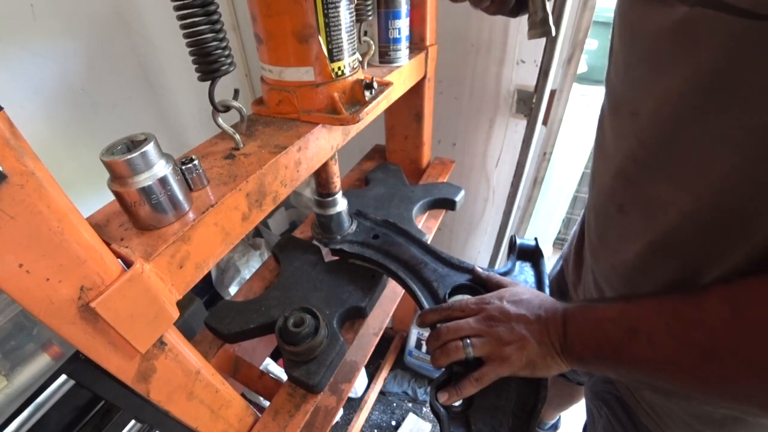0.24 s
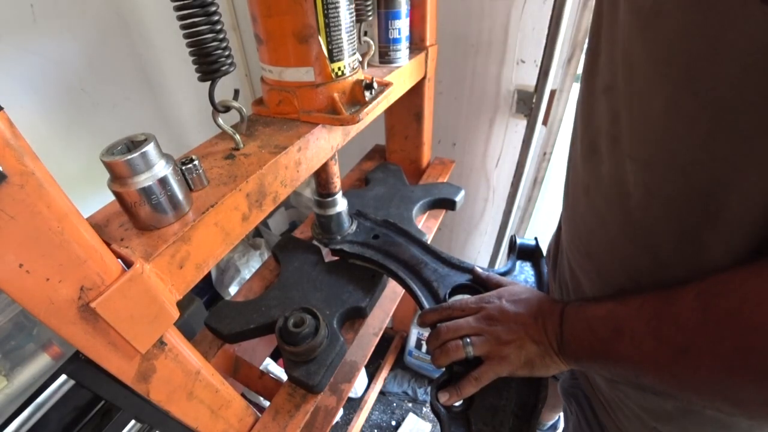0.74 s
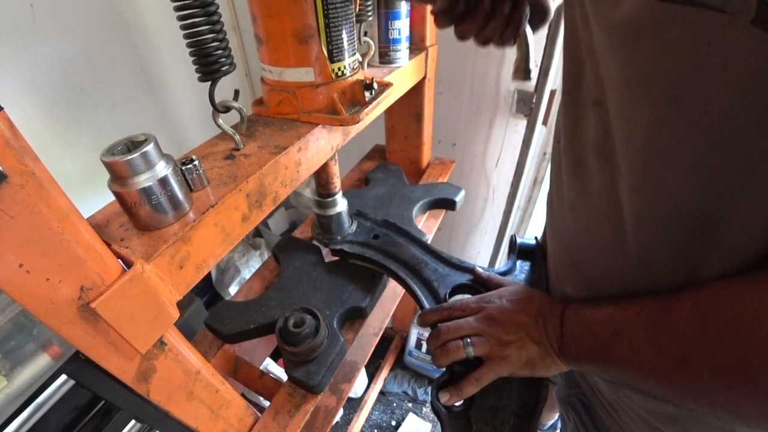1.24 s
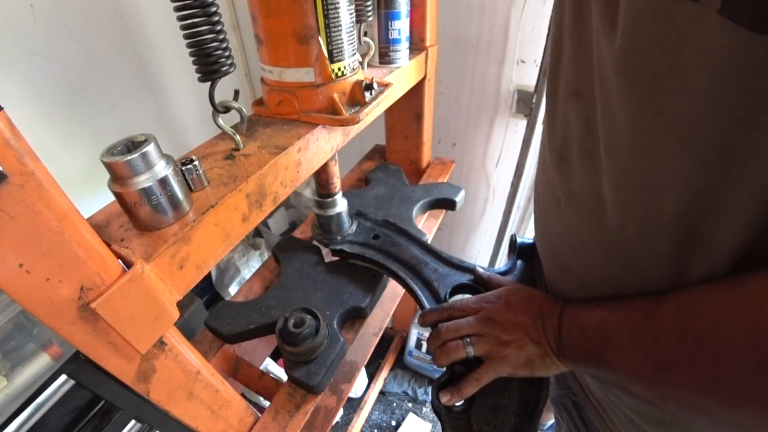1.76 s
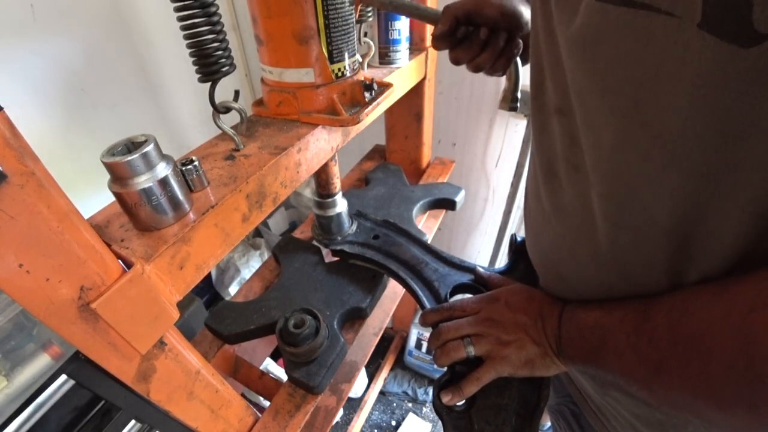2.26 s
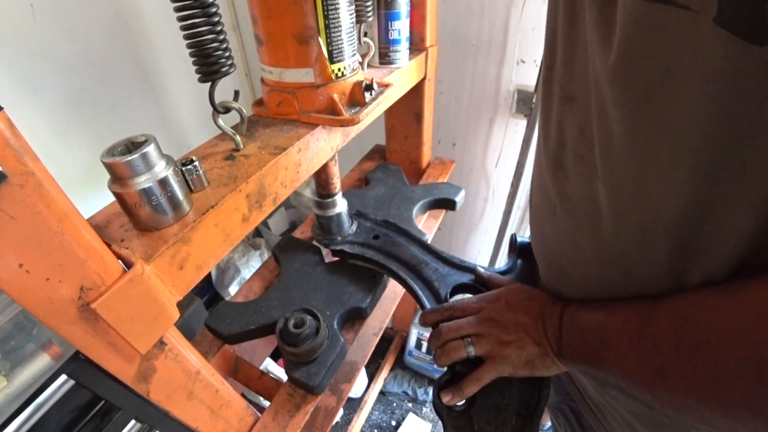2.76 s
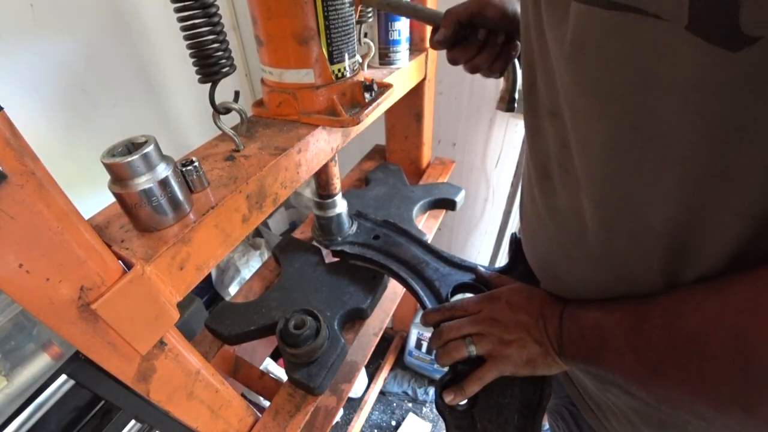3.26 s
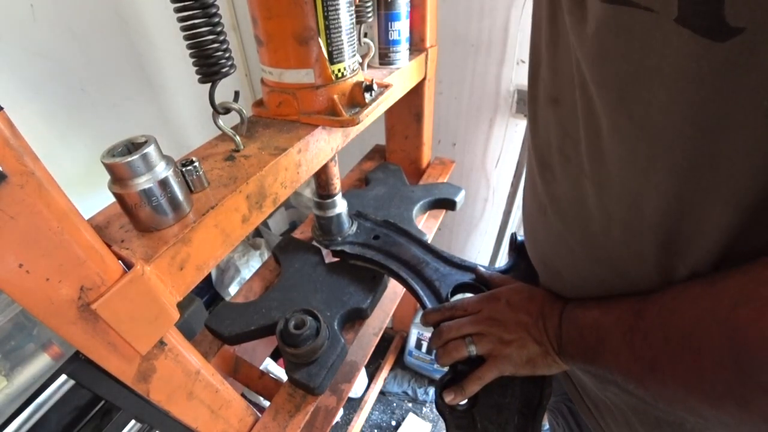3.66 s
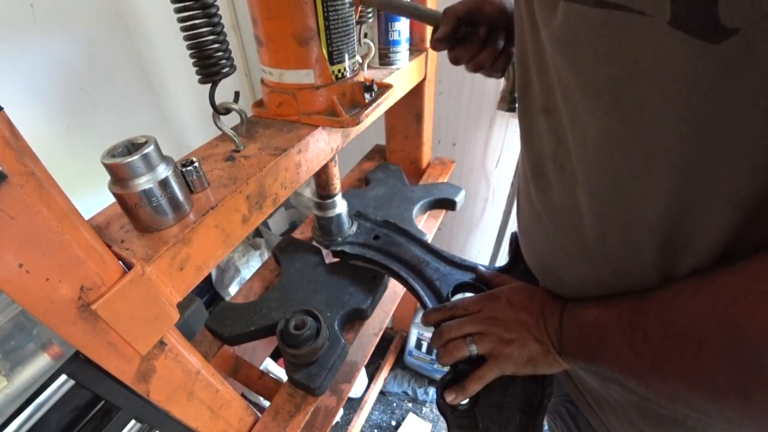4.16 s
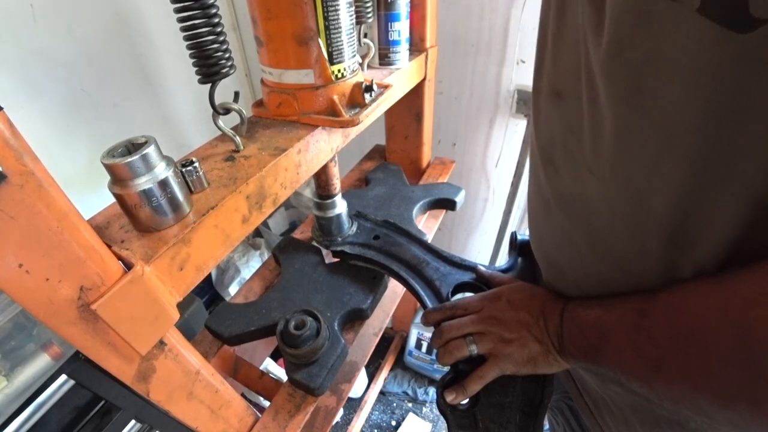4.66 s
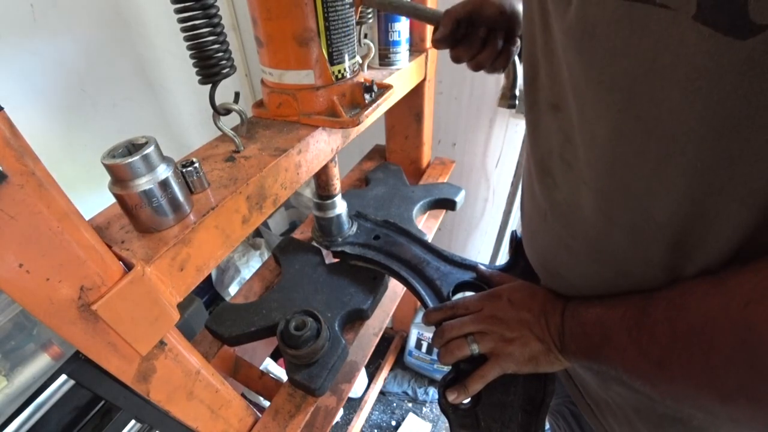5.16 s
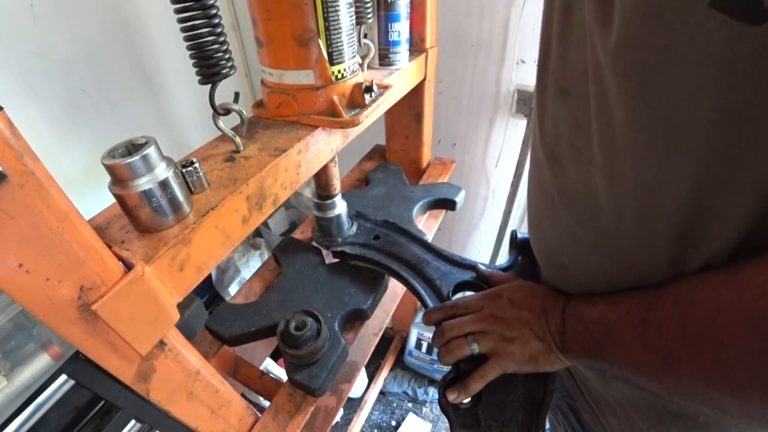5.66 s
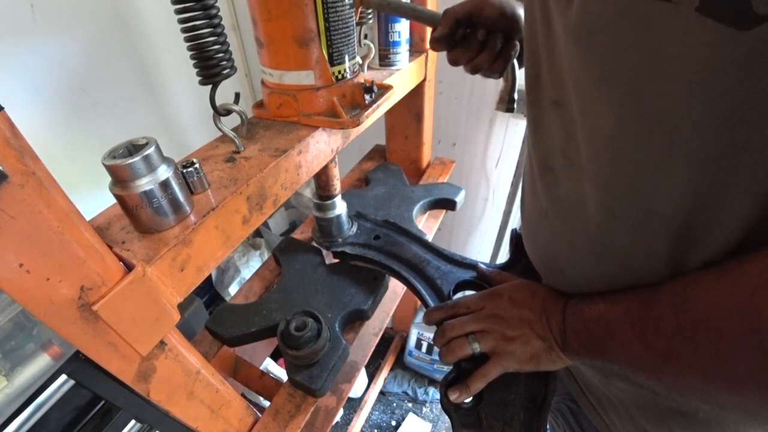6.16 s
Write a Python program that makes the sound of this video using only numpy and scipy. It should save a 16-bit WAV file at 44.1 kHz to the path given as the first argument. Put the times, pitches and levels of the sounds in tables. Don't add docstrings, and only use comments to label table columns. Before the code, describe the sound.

Close to a small stereo microphone in a small shed, a hand-pumped steel press clacks about once a second. Each stroke brings a tight burst of sharp bright snaps with loose rattling and pings, then a duller knock as the handle reaches its stop. The heavy frame booms softly and rings briefly, over a quiet steady hum and fine hiss.

```python
import sys
import numpy as np
from scipy import signal
from scipy.fft import rfft, irfft
from scipy.io import wavfile
from scipy.ndimage import uniform_filter1d

SR = 44100
rng = np.random.default_rng(int(sys.argv[2]) if len(sys.argv) > 2 else 0)


def ratio_of_db(decibels):
    return 10 ** (np.asarray(decibels, float) / 20)


def wav_out(sig):
    wavfile.write(sys.argv[1], SR, np.round(np.clip(np.atleast_2d(sig).T, -1, 1) * 32767).astype(np.int16))


N = 282681

# frequency in Hz, level in dB per Hz.
HUM_COLOUR = [(15, -39), (25, -29.5), (126, -16.5), (516, -2.5), (955, -2.5), (1330, 0), (1480, -2),
              (2230, -7.5), (3030, -7), (4340, -10), (5470, -7.5), (10600, -13.5), (11500, -14.5),
              (15000, -59.5), (22000, -120)]
# frequency in Hz, likeness from 0 to 1.
LIKENESS = [(60, 0.67), (220, 0.19), (450, 0.16), (830, 0.12), (3100, 0.14), (11600, 0.15)]
# frequency in Hz, balance in dB.
BALANCE = [(60, 0), (220, 0), (830, -0.9), (3100, 0.1), (11600, -2)]
# time in seconds, level in dB.
SONG = [(0.0, -40.5), (0.61, -45.5), (0.87, -37), (1.28, -45.5), (1.78, -32.5), (2.11, -45), (2.66, -32.5),
        (3.05, -48), (3.641, -37.5), (4.02, -63), (4.68, -35.5), (5.1, -65), (5.48, -37.5), (6.25, -41.5),
        (6.41, -38)]
# time in seconds, dB over the resting hiss.
OIL_FIZZ = [(0, -3.5), (.4, -2.5), (.65, 0.5), (.85, -10), (1.35, -1), (2.1, 1.5), (2.35, -2.5), (2.95, 1),
            (3.4, -1), (3.95, 0.5), (4.15, 1), (4.33, -3.5), (4.65, 2.5), (5.0, 1), (5.2, 5.5), (5.45, 0),
            (6.0, 5), (6.41, -3.5)]
# time in seconds, level in dB.
THUDS = [(0.2, -49), (0.998, -48.5), (1.411, -52.5), (1.898, -46.5), (2.27, -53), (2.771, -41.5),
         (3.263, -51), (3.502, -51), (3.768, -49.5), (4.2, -50), (4.487, -56), (4.769, -48.5),
         (5.261, -51.5), (5.814, -42.5), (6.225, -53)]
# time in seconds, level in dB, pitch in Hz,
# time to fall 60 dB in seconds.
TAILS = [(.192, -47.5, 1023, .6), (.192, -43, 1410, 0.34), (.192, -56, 3074, 0.23), (.6, -60, 1270, 0.6),
         (.6, -58.5, 1780, 0.54), (.993, -50, 6416, 0.43), (1.651, -34, 1311, 0.37),
         (1.651, -44.5, 1817, 0.28), (1.651, -53, 4412, 0.3), (1.896, -46.5, 2894, 0.36),
         (1.896, -47, 1155, 0.49), (2.258, -63, 3257, 0.18), (2.258, -55, 985, 0.56),
         (2.519, -53, 2961, 0.53), (2.519, -43, 2151, 0.23), (2.769, -49.5, 1327, 0.39),
         (3.254, -56, 3580, .6), (2.769, -51, 619, 0.43), (3.519, -47, 8215, 0.44),
         (3.519, -45, 1394, 0.33), (3.772, -53, 2966, 0.71), (3.772, -55, 1814, 0.58),
         (4.514, -51, 1362, 0.45), (4.514, -53, 2966, 0.37), (4.775, -54.5, 622, 0.48),
         (5.821, -46, 5560, .5), (4.775, -52, 5520, .5), (1.896, -60, 5700, .5), (5.821, -46, 8900, .4),
         (4.775, -51, 8540, 0.37), (5.821, -37.5, 1386, 0.28), (5.821, -48, 3257, .35),
         (5.821, -43.5, 4183, 0.46), (6.217, -56, 619, 0.51), (6.217, -57, 2896, .45)]
# time in seconds, then dB of each of three modes.
STOP_RINGS = [
    (1.401, -39, -37, -30.5),
    (2.258, -41, -55, -28.5),
    (3.253, -42.5, -38, -48),
    (4.194, -46, -42, -40),
    (5.25, -39.5, -39, -39.5),
    (6.217, -37.5, -44, -51),
]
STOP_HZ = (1357, 1389, 1565)
STOP_T60 = (0.28, 0.3, 0.17)
# start in seconds, length in seconds, top level in dB,
# place of the top from 0 to 1.
RUBS = [
    (0.429, 0.082, -54, .05),
    (0.437, 0.048, -41, 0.6),
    (1.804, 0.069, -28.5, 1),
    (5.121, 0.17, -55, .05),
    (5.592, 0.15, -31.5, 0.53),
]
# time in seconds, level in dB, pitch in Hz,
# fall time in seconds.
PINGS = [(.119, -32.5, 6260, 0.068), (.714, -13, 6400, 0.048), (1.652, -10, 7970, 0.065),
         (2.488, -11.5, 6440, 0.09), (4.455, -21, 6950, 0.17), (4.479, -17, 6410, 0.18),
         (5.105, -54.5, 6760, 0.79), (5.540, -12, 6290, 0.046), (0.571, -28, 6810, 0.045),
         (0.192, -15, 1620, 0.079), (.953, -14.5, 9450, 0.043), (0.996, -25, 1366, 0.22),
         (1.602, -17, 2970, 0.073), (1.651, -26, 1265, 0.3), (1.664, -16.5, 3020, 0.063),
         (1.665, -17, 4450, 0.073), (1.863, -22, 8500, 0.064), (1.897, -28.5, 1278, 0.24),
         (2.455, -29, 6460, 0.046), (3.476, -17, 3300, 0.06), (3.497, -14, 6340, .04),
         (3.515, -26, 8380, 0.17), (3.516, -13.5, 10470, .04), (3.724, -28, 6300, 0.045),
         (.747, -9, 3800, .045), (4.513, -21.5, 1210, 0.085), (4.774, -32, 3253, 0.28),
         (5.79, -23, 4250, 0.17), (5.82, -44, 1180, 0.18), (5.84, -41, 612, 0.6), (.182, -18, 4550, .03),
         (1.859, -13, 2200, .05), (4.745, -13, 2150, 0.025), (4.747, -14, 4750, 0.036),
         (5.784, -15, 4660, 0.036), (5.822, -35, 2960, 0.45), (5.823, -32, 3590, 0.5),
         (.73, -22, 1386, 0.18), (2.52, -30, 1830, 0.21)]
# pitch in Hz, level in dB, time to fall 60 dB in seconds.
STEEL_MODES = [(619, -19, .5), (824, -15, .2), (985, -11, .35), (1070, -14, .3), (1170, -13, .12),
               (1272, -8, .3), (1355, -9, .3), (1765, -21, .3), (1814, -14, .5), (2244, -17, .3),
               (2894, -16, .45), (2962, -13, .5), (3256, -11, .33), (3415, -17, .3), (3577, -16, .45),
               (4185, -17, .35), (4580, -10, .1), (5347, -16, .35), (5447, -17, .4), (5634, -21, .45),
               (6416, -17, .4), (6620, -21, .3), (6675, -19, .4), (7437, -19, .25), (7870, -21, .3),
               (7994, -21, .3), (8214, -19, .35), (8430, -17, .4), (8515, -21, .35), (8661, -16, .35),
               (8742, -21, .3), (9119, -20, .3), (2557, -19, .3), (10292, -21, .3), (3881, -19, .3)]
# pitch in Hz, level in dB, time to fall 60 dB in seconds.
STOP_MODES = [(622, -19, .35), (830, -15, .15), (985, -14, .3), (1071, -11, .14), (1170, -8, .06),
              (1290, -13, .08), (1430, -11, .12), (1520, -10, .1), (1478, -9, .13), (1600, -9, .12),
              (3257, -21, .4), (1680, -9, .07), (2055, -5, .03), (3400, -15, .15), (3590, -20, .4)]
# frequency in Hz, level in dB per Hz.
RATTLE_COLOUR = [(35, -62), (60, -75.5), (485, 0), (1300, 7), (1700, -3.5), (1890, -3), (3280, 0),
                 (3750, 0), (8830, -7.5), (10400, -4.5), (11500, -11), (15000, -49), (22000, -120)]
# centre in Hz, width in Hz, gain in dB # (negative
STEEL_BODY = [(1300, 120, -5), (2200, 105, 5.5), (3200, 140, 5), (3970, 120, -0.5), (6400, 2400, 2.5),
              (8110, 470, 6), (11200, 1100, 6)]
# centre in Hz, width in Hz, gain in dB.
STOP_BODY = (1680, 600, 4.8)
RATTLE_T60 = [0.23, 0.13, 0.087]
RATTLE_RISE = [0.0013, 0.00064, 0.0013]
# time in seconds, snap peak in dB, pitch in Hz, fizz in dB.
TICKS = [(0.115, -34, 4220, -41.5), (0.428, -43, 6770, -42), (0.5722, -34, 6730, -43.5),
         (1.1958, -33.5, 6640, -28.5), (1.245, -39, 5400, -50), (1.28, -43, 6540, -34),
         (1.5244, -44, 1360, -55), (2.046, -56, 1240, -35.5), (2.144, -44, 6800, -41),
         (2.2, -42, 6500, -30), (2.414, -62, 1250, -34), (2.9645, -39, 5200, -31), (2.986, -38, 6200, -37),
         (3.023, -26, 10300, -24.5), (3.1196, -27.5, 9350, -26.5), (3.3534, -58, 1330, -36),
         (3.664, -52, 1405, -34), (4.049, -63, 1150, -43.5), (4.973, -48.5, 5870, -45),
         (5.0422, -65, 1180, -42), (5.059, -36, 5700, -39.5), (5.1084, -54, 7100, -36.5),
         (6.093, -42.5, 6440, -35), (0.648, -53, 6400, -39.5), (1.187, -41, 6100, -35),
         (2.37, -43, 5400, -50), (3.953, -48, 5000, -46), (4.095, -52, 7950, -38), (4.216, -29, 7440, -29)]
# time in seconds, snap peak in dB, pitch in Hz,
# rattle in dB, fizz in dB.
BUMPS = [(0.078, -40, 8340, -44, -46.5), (0.104, -38, 5270, -33, -35), (0.579, -43, 665, -44, -57),
         (1.812, -58, 3420, -31, -32.5), (3.0678, -39, 6860, -35.5, -29), (3.1344, -34, 6940, -38, -54),
         (3.2239, -15, 10350, -28, -20), (3.3332, -38, 1390, -36.5, -43), (4.4012, -38, 1070, -40, -74),
         (4.6568, -46.5, 1200, -46, -41), (5.2724, -33, 1390, -46, -37), (6.0028, -41.5, 6030, -54, -36),
         (6.3774, -55, 1300, -46, -67)]
# time in seconds, snap peak in dB, pitch
# in Hz, rattle in dB, fizz in dB.
SLACK = [(0.135, -37, 7000, -35, -34), (.713, -32, 6400, -25, -34), (.744, -5.5, 3890, -40, -51),
         (4.443, -31.5, 2860, -26.5, -24.5), (2.868, -40, 1010, -61.5, -61),
         (0.915, -34.5, 5500, -29.5, -30), (1.589, -30, 1300, -47, -27), (1.828, -30, 3100, -49, -46),
         (2.237, -42.5, 9900, -69, -30), (2.444, -37, 2420, -33, -61), (2.456, -45, 6200, -28, -55),
         (3.010, -56, 10000, -63, -32), (3.208, -39, 10400, -43, -24), (3.462, -47, 3200, -17, -38),
         (3.696, -28.5, 5860, -33, -23.5), (4.702, -45, 6500, -36.5, -36), (5.495, -31, 2200, -27, -28.5),
         (5.764, -42, 3410, -26.5, -33), (1.439, -40, 6400, -46, -30), (1.470, -37.5, 6740, -60, -50.5),
         (1.7985, -40, 5400, -36, -48), (1.8435, -31, 6400, -32, -47.5), (3.7228, -24, 10100, -41, -29),
         (.590, -41, 1120, -63, -62), (4.295, -46, 2500, -44.5, -68), (1.266, -43, 1970, -43, -53),
         (3.4348, -53, 2470, -41, -56.5), (.603, -56, 4000, -59, -44), (1.904, -23, 9000, -40, -29),
         (2.652, -52, 3000, -39, -61), (3.318, -41, 10300, -60, -50), (4.633, -43, 5500, -41, -46)]
# time in seconds, snap peak in dB, then low weight,
# rattle and fizz in dB.
KNOCKS = [
    (1.4006, -15.5, -27.5, -33, -40.5),
    (2.2567, -12, -28, -29.5, -35),
    (3.252, -15, -28, -32, -32.5),
    (4.1937, -27, -29.5, -46, -39.5),
    (5.249, -26, -30.5, -39.5, -52),
    (6.2154, -16, -28, -30, -33.5),
]
# time in seconds, snap peak in dB, pitch in Hz,
# rattle of the linkage in dB, rattle of the frame in dB.
LINKS = [(0.1903, -14.5, 2770, -23, -21.5), (0.683, -30.5, 2900, -36, -51), (0.9287, -27, 2970, -31, -55),
         (0.9735, -44, 3000, -34, -25.5), (1.5533, -26, 2850, -36.5, -44), (1.5988, -17, 2920, -26.5, -29),
         (2.5172, -14.5, 3690, -28.5, -33.5), (2.706, -28, 2860, -35, -33.5),
         (2.7237, -13, 3430, -24, -26.5), (2.7515, -26, 2960, -36, -36), (2.767, -15, 3500, -22.5, -25.5),
         (3.5065, -21, 3340, -27, -25), (3.5176, -33, 3560, -57, -26.5), (3.5374, -22, 2300, -33.5, -37.5),
         (3.709, -34, 3100, -30.5, -50), (3.7705, -16.5, 3060, -29.5, -30), (3.7986, -22, 9500, -53, -42),
         (2.4685, -21.5, 2940, -40, -44), (2.4825, -10.5, 10770, -32, -43), (3.481, -20.5, 3300, -29, -34),
         (4.4858, -11, 5470, -30, -32.5), (4.5118, -15.5, 3700, -34, -28.5),
         (4.7727, -22, 6420, -26.5, -32.5), (5.4631, -29.5, 2700, -37, -47),
         (5.5203, -14.5, 3900, -27, -28), (5.5582, -18.5, 3770, -35, -32), (5.5797, -35, 2000, -53, -46),
         (5.8192, -10.5, 3730, -22.5, -19)]
# time in seconds, snap peak in dB, pitch in Hz,
# rattle of the linkage in dB, rattle of the frame in dB.
SOCKET = [(0.145, -32.5, 5070, -24, -29.5), (0.7223, -2.5, 5670, -22, -25),
          (1.6229, -12.5, 6400, -24.5, -25), (1.8941, -11.5, 5300, -22, -26),
          (2.4667, -18, 5600, -21.5, -29.5), (2.4805, -20, 6400, -28, -22), (3.4742, -13, 6350, -22.5, -26),
          (3.7292, -25.5, 6300, -33.5, -32), (4.4517, -20.5, 7320, -27.5, -34.5),
          (4.4772, -10, 6140, -18, -27), (5.5384, -12.5, 6990, -30, -24.5)]
# time in seconds, snap peak in dB,
# pitch in Hz, rattle of the linkage in dB, rattle of the frame in dB.
MAIN_PIN = [
    (0.167, -2.5, 4570, -20, -30),
    (0.7015, -16, 4600, -28.5, -24),
    (0.7482, -8, 4650, -24.5, -24.5),
    (0.9511, -7, 4590, -22.5, -26),
    (0.9914, -21, 4900, -22.5, -18.5),
    (1.6496, -6.5, 3900, -22.5, -22.5),
    (1.8602, -7.5, 4480, -21, -30),
    (3.7529, -9.5, 4630, -18.5, -27),
    (4.7454, -6.5, 4840, -20.5, -27),
    (5.7821, -8, 4520, -17.5, -19.5),
]


def evened(x):
    return x / np.sqrt(np.mean(x ** 2) + 1e-20)


def read(points, hz):
    f, value = np.transpose(points)
    return np.interp(np.log(hz + 1), np.log(f + 1), value)


def slow_noise(size, samples):
    return evened(uniform_filter1d(rng.standard_normal(size), samples))


def add(mix, s, sound):
    part = mix[:, round(s * SR):][:, :sound.shape[1]]
    part += sound[:, :part.shape[1]]


def pair(size, likeness=1):
    hz = np.fft.rfftfreq(size, 1 / SR)
    mid, side = rfft(rng.standard_normal((2, size)))
    alike = np.clip(likeness * read(LIKENESS, hz), 0, .99)
    side = side * np.sqrt((1 - alike) / 2)
    balance = ratio_of_db(np.outer([.5, -.5], read(BALANCE, hz)))
    return hz, np.array([mid + side, mid - side]) * balance


def third(hz, k):
    low = 1 / (1 + (hz / 2000) ** 8)
    high = 1 / (1 + (5500 / (hz + 1)) ** 8)
    middle = np.clip(1 - low - high, 0, 1)
    return np.sqrt([low, middle, high][k])


def shed():
    t = np.arange(N) / SR
    hz, z = pair(N, 1.1)
    wobble = ratio_of_db(1.2 * slow_noise(N, 4000))
    song_modes = STEEL_MODES[3:9] + [(1382, -13, 0), (1307, -12, 0)]
    lines = sum(ratio_of_db(db) / (1 + ((hz - f) / 9) ** 2) for f, db, _ in song_modes)
    song_db = np.interp(t, *np.transpose(SONG))
    song = ratio_of_db(song_db - 20) * evened(irfft(z * lines, N))
    swell_db = 4 + 0.13 * (song_db + 57.0)
    hum = evened(irfft(z * ratio_of_db(read(HUM_COLOUR, hz)), N))
    hiss = irfft(rfft(hum) / (1 + (3000 / (hz + 1)) ** 4), N)
    hum = hum + (ratio_of_db(np.interp(t, *np.transpose(OIL_FIZZ))) - 1) * hiss
    hum_db = -58 - 6.0 + swell_db
    return wobble * (ratio_of_db(hum_db) * hum + np.roll(song, 999, axis=1))


def walls(x):
    t = np.arange(SR // 3) / SR
    signs = rng.choice([-1., 1.], (2, len(t)))
    present = rng.random((2, len(t))) < .05
    taps = signs * present * ratio_of_db(-60 * t / 0.13) * (t > .004)
    taps = taps / np.linalg.norm(taps[0])
    return signal.fftconvolve(x.mean(0)[None], taps, axes=1)[:, :N]


def thuds():
    out, t = np.zeros((2, N)), np.arange(16384) / SR
    for s, db in THUDS:
        hz, z = pair(len(t), 5.2)
        boom = evened(irfft(z / (1 + ((hz - 280) / 110) ** 4), len(t)))
        add(out, s, ratio_of_db(db - 60 * t / 0.25) * (1 - np.exp(-t / 0.02)) * boom)
    return out


def tails():
    out, t = np.zeros((2, N)), np.arange(24000) / SR
    rows = list(TAILS)
    for s, *levels_db in STOP_RINGS:
        rows += [(s, *mode) for mode in zip(levels_db, STOP_HZ, STOP_T60)]
    for (s, db, hz, t60), (beat, phase, side) in zip(rows, rng.random((len(rows), 3))):
        waver_hz = 8 + 20 * beat
        waver_db = 3.5 * np.sin(2 * np.pi * (waver_hz * t + phase))
        tone = np.sin(2 * np.pi * hz * t + np.array([[-.5], [.5]]) * (side - .5))
        add(out, s, ratio_of_db(db + waver_db - 60 * t / t60) * (1 - np.exp(-t / 0.0047)) * tone)
    return out


def plunger():
    t, level = np.arange(N) / SR, np.zeros(N)
    for s, length, db, top in RUBS:
        u = (t - s) / length
        top = np.clip(top, 0, 1)
        from_top = (u - top) / max(top, 1 - top)
        level += ratio_of_db(db - 32 * from_top ** 2) * (u > 0) * (u < 1)
    hz, z = pair(N, 1.0)
    seal_db = 9.0 / (1 + ((hz - 2600) / 150) ** 2)
    colour = ratio_of_db(read(RATTLE_COLOUR, hz) + seal_db) * (1 - third(hz, 0))
    grit = ratio_of_db(1.5 * slow_noise(N, 300))
    return ratio_of_db(-15.5) * uniform_filter1d(level, 800) * grit * evened(irfft(z * colour, N))


def pings():
    out, t = np.zeros((2, N)), np.arange(16384) / SR
    for (s, db, hz, t60), (split, phase) in zip(PINGS, rng.standard_normal((len(PINGS), 2))):
        twin_hz = hz + 67 * split * hz / 6400
        tone = np.sin(2 * np.pi * hz * t) + np.sin(2 * np.pi * twin_hz * t + 9 * phase)
        fade = ratio_of_db(db - 60 * (t / t60) ** 0.58) * (1 - np.exp(-t / 0.0046))
        add(out, s, fade * tone * ratio_of_db([[-.8], [.8]]))
    return out


def snap(db, hz, t):
    spread, phase = rng.standard_normal((2, 3, 1))
    looseness = .005 if abs(hz - 4600) < 200 else .025
    ring = np.sin(2 * np.pi * hz * (1 + looseness * spread) * t + phase).sum(0)
    if abs(hz - 4600) < 350:
        ring = ring + .3 * np.sin(2 * np.pi * 2250 * t)
    band = signal.butter(2, (.6 * hz, min(1.5 * hz, 11000)), "band", fs=SR, output="sos")
    grit = evened(signal.sosfilt(band, rng.standard_normal(len(t))))
    tuned = .35 + sum(.65 / (1 + ((hz - f) / 250) ** 2) for f in (4600, 6430))
    ring = tuned * ring * ratio_of_db(-60 * (t / (.006 + .013 * tuned)) ** 1.7)
    grit = .9 * grit * ratio_of_db(-60 * (t / .008) ** 1.6)
    both = (ring + grit) * (1 - np.exp(-t / .0003))
    return ratio_of_db(db - 4) * both / abs(both).max() * ratio_of_db([[-.6], [.6]])


def rattle(levels_db, t, shorten, fine_db):
    hz, z = pair(len(t), 5.27)
    struck_db = 2.6 * slow_noise(len(hz), 20)
    body_db = sum(db / (1 + (2 * (hz - f) / w) ** 2) for f, w, db in STEEL_BODY)
    z = z * ratio_of_db(read(RATTLE_COLOUR, hz) + fine_db + struck_db + body_db)
    shared, *own = uniform_filter1d(rng.standard_normal((4, len(t))), 70)
    chatter = ratio_of_db(2.6 * evened(.6 * shared + np.array(own)))
    out = 0
    for k, (db, t60, rise) in enumerate(zip(levels_db, RATTLE_T60, RATTLE_RISE)):
        haze = ratio_of_db(-28.5 - 60 * t / .5)
        fade = ratio_of_db(db) * (ratio_of_db(-60 * t / (t60 * shorten)) + haze) * (1 - np.exp(-t / rise))
        out = out + fade * chatter[k] * evened(irfft(z * third(hz, k), len(t)))
    return out


def strike(events, rings, fine_db, shorten, rattle_db, ring_db, uneven_db):
    out, t, long = np.zeros((2, N)), np.arange(12288) / SR, np.arange(17000) / SR
    hz, db, t60 = np.transpose(rings + rings)[:, :, None]
    twin = (np.arange(len(hz)) >= len(rings))[:, None]
    hz = hz * (1 + .0012 * rng.standard_normal(hz.shape) * twin)
    fade = ratio_of_db(db - 60 * long / np.clip(t60, .03, .55)) * (1 - np.exp(-long / 0.00013))
    modes = fade * np.exp(2j * np.pi * hz * long)
    cosines, sines = modes.real.copy(), modes.imag.copy()
    for s, snap_db, snap_hz, *levels_db in events:
        add(out, s, snap(snap_db, snap_hz, t[:2048]))
        add(out, s, ratio_of_db(rattle_db) * rattle(levels_db, t, shorten, fine_db))
        drive = sum(ratio_of_db(level) * third(hz[:, 0], k) for k, level in enumerate(levels_db))
        size, phase, side = rng.standard_normal((3, len(hz)))
        drive = drive * ratio_of_db(ring_db + uneven_db * size) * np.exp(9j * phase)
        drive = (1 + .2 * np.outer([1, -1], side)) * drive
        add(out, s, drive.real @ cosines - drive.imag @ sines)
    return out


def light(table, lows_db, dull_db):
    return [(s, db, hz, body + lows_db + dull_db * (hz < 1800), body, fizz) for s, db, hz, body, fizz in table]


def touches(fine_db):
    ticks = [(s, db, hz, fizz - 19.5, fizz - 21, fizz) for s, db, hz, fizz in TICKS]
    events = sorted(ticks + light(BUMPS, -14.5, 13)) + light(SLACK, -6, 32.5)
    return strike(events, STEEL_MODES, fine_db, 1.0, -18.5, -25.0, 1.8)


def handle_stop(fine_db):
    centre_hz, width_hz, top_db = STOP_BODY
    hz = np.fft.rfftfreq(12288, 1 / SR)
    stop_db = top_db / (1 + (2 * (hz - centre_hz) / width_hz) ** 2)
    events = [(s, db, 3686, *levels_db) for s, db, *levels_db in KNOCKS]
    return strike(events, STOP_MODES, fine_db + stop_db, 0.65, -4.0, -6.0, 2.2)


def pin_blows(fine_db):
    events = []
    for table, lows_db in ((MAIN_PIN, -12.5), (SOCKET, -7), (LINKS, -7.5)):
        events += [(s, db, hz, frame + lows_db, links, frame) for s, db, hz, links, frame in table]
    return strike(sorted(events), STEEL_MODES, fine_db, 1.0, -7.0, -21.5, 0.48)


def scene():
    fine_db = 1.4 * slow_noise(6145, 11)
    near = pin_blows(fine_db) + handle_stop(fine_db) + touches(fine_db)
    near += pings() + plunger() + thuds() + tails()
    low_cut = signal.butter(4, 203, "high", fs=SR, output="sos")
    near = signal.sosfilt(low_cut, near) + ratio_of_db(-14) * near
    return near + ratio_of_db(-15.5) * walls(near) + shed()


def band_limit(x):
    return signal.sosfilt(signal.butter(12, 11040, fs=SR, output="sos"), x)


def record(dry):
    rounded = .9 * np.tanh(dry / .9)
    top_cut = signal.firwin(301, 11130, fs=SR)
    finished = signal.oaconvolve(rounded, top_cut[None], "same")
    return band_limit(finished)


dry = scene()
out = record(dry)
wav_out(out)
```